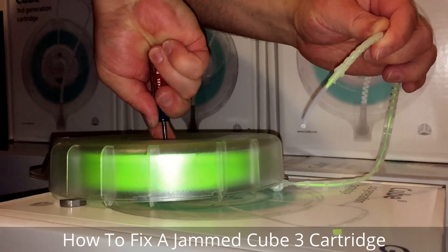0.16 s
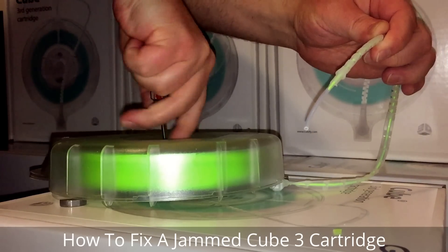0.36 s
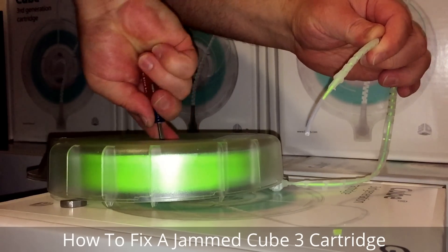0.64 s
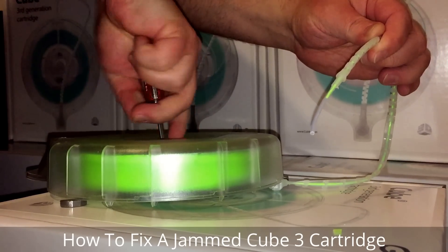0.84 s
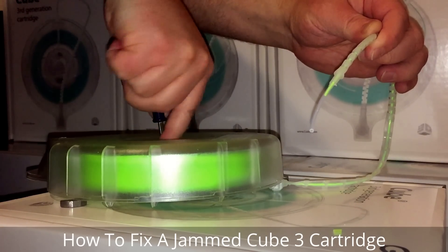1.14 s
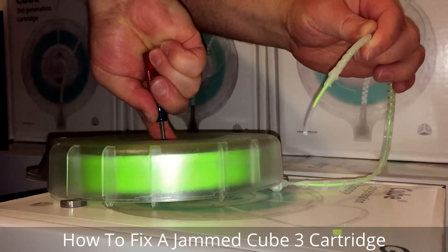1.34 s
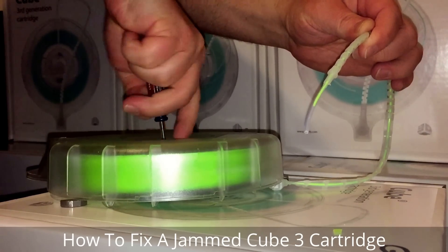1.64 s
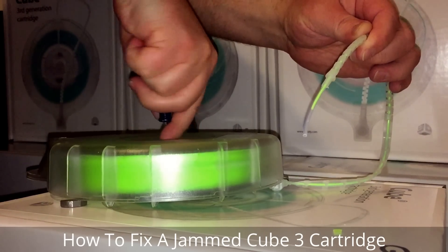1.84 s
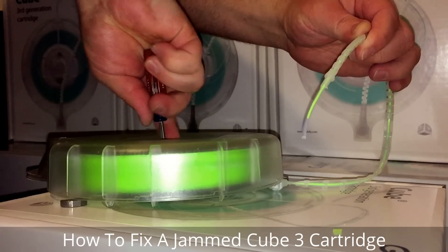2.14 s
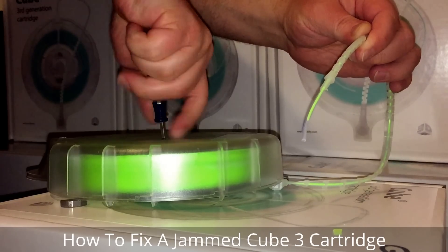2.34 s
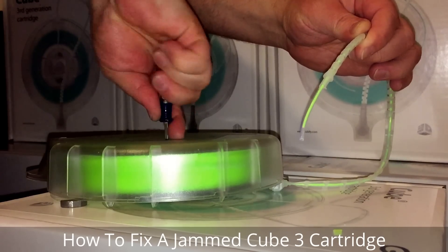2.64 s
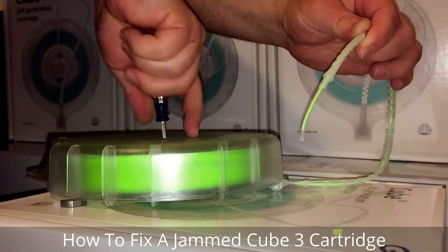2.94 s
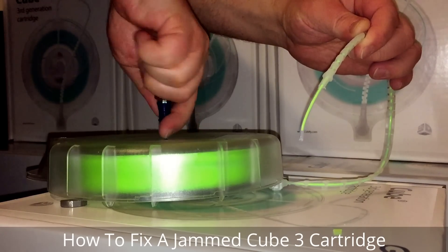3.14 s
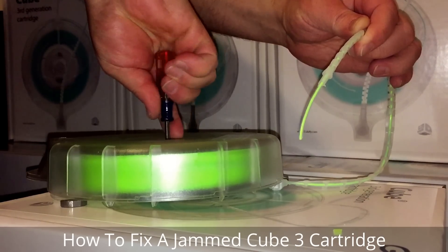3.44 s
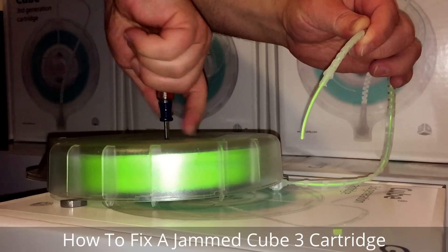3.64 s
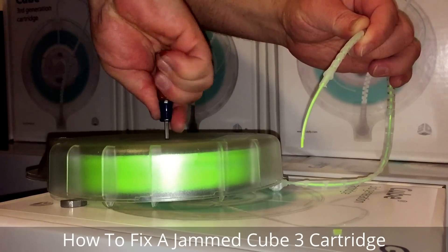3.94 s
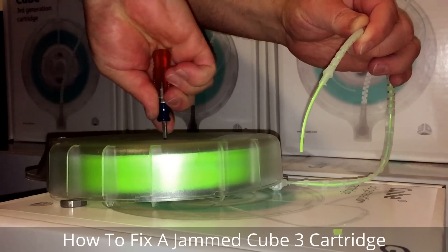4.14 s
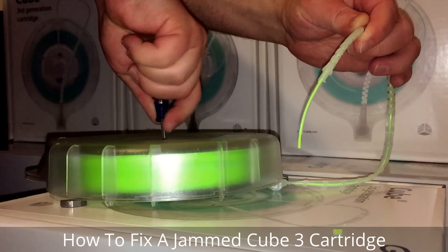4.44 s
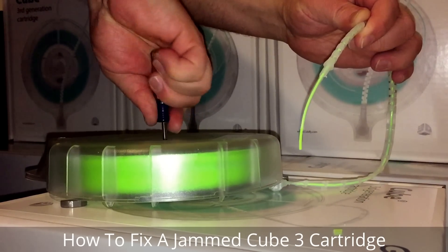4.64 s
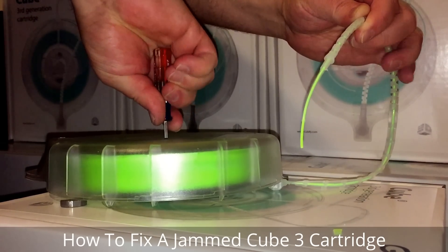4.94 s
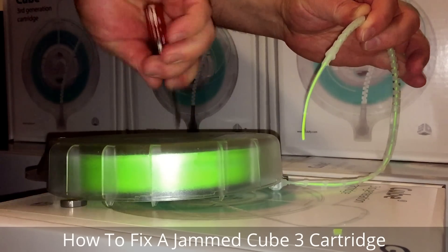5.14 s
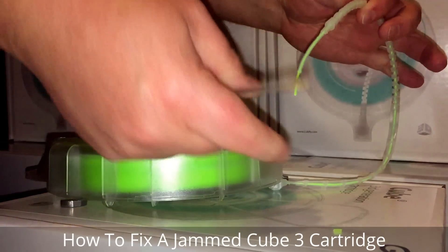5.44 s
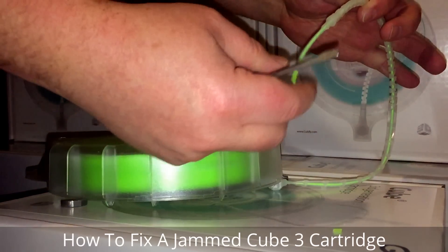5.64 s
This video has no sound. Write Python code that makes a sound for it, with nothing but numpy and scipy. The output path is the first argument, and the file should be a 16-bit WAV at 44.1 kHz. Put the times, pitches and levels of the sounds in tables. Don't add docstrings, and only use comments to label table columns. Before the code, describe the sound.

Close to a phone microphone in a small quiet room, a screwdriver turns a plastic gear inside a hollow cartridge. Uneven dry ticks and short grinding scrapes come in bursts. Early on, one jammed slip cracks very loudly and booms the table. Clicks continue, clustering densely later, until the steel blade rattles out of its slot, leaving faint hum and hiss.

```python
import sys
import numpy as np
from scipy import signal
from scipy.fft import rfft, irfft, next_fast_len
from scipy.io import wavfile

SR = 44100
rng = np.random.default_rng(int(sys.argv[2]) if len(sys.argv) > 2 else 0)


def waveform_to_disk(signal):
    frames = np.transpose(np.atleast_2d(signal))
    scaled = np.clip(frames, -1, 1) * 32767
    samples = np.round(scaled).astype(np.int16)
    wavfile.write(sys.argv[1], SR, samples)


def ratio(d):
    e = np.asarray(d, float) / 20
    return 10 ** e


N = 255382
T = np.arange(N) / SR


def shade(x, points):
    size = next_fast_len(len(x))
    hz, db = np.transpose(points)
    f = np.maximum(np.arange(size // 2 + 1) * SR / size, 1)
    gain = ratio(np.interp(np.log(f), np.log(hz), db))
    return irfft(rfft(x, size) * gain, size)[:len(x)]


def band(x, lo_hz, hi_hz):
    return signal.sosfilt(signal.butter(2, [lo_hz, min(hi_hz, 20000)], "band", fs=SR, output="sos"), x)


def unit(x):
    return x / np.sqrt(np.mean(x ** 2))


def ring(x, hz, t60):
    r = np.exp(-np.log(1000) / (max(t60, .002) * SR))
    w = 2 * np.pi * hz / SR
    return signal.lfilter([0, r * np.sin(w)], [1, -2 * r * np.cos(w), r * r], x)


def contacts(times, dbs, contact_s, hz=0):
    out, t = np.zeros(N + 800), np.arange(800) / SR
    swell = (1 - np.exp(-t / 0.00082)) * np.exp(-t / contact_s)
    pushes = rng.standard_normal((len(times), 800)) * swell
    felt = overall = np.sqrt(np.sum(pushes ** 2, axis=1))
    if hz:
        at_mode = np.abs(pushes @ np.exp(2j * np.pi * hz * t))
        felt = np.maximum(at_mode, overall / 2)
    for s, gain, push in zip(times, ratio(dbs) / felt, pushes):
        out[int(s * SR):][:800] += gain * push
    return out[:N]


def strike(modes, times, dbs, contact_s, scatter_db, rub=0, centre_hz=None, focus_db=0):
    hz = np.array(modes)[:, 0]
    share = scatter_db * rng.standard_normal((len(times), len(modes)))
    if centre_hz is not None:
        share = share - focus_db * np.log2(hz / centre_hz[:, None]) ** 2
    norm = np.sqrt(sum(ratio(db) ** 2 for _, db, _ in modes))
    out = np.zeros(N)
    for k, (f, db, t60) in enumerate(modes):
        push = contacts(times, dbs + share[:, k], contact_s, f) + rub
        out += ratio(db) / norm * ring(push, f, t60)
    return out


def grains(per_s, spread_db, grain_s):
    size_db = spread_db * np.minimum(rng.exponential(size=N), 3)
    hit = (rng.random(N) < per_s / SR) * ratio(size_db)
    envelope = signal.lfilter([1], [1, -np.exp(-1 / (grain_s * SR))], hit)
    return unit(envelope * rng.standard_normal(N))


def swells(table):
    gain = np.zeros(N)
    for s, db, rise_s, fall_s in table:
        away = np.maximum((s - T) / max(rise_s, .001), (T - s) / max(fall_s, .001))
        gain += ratio(db - 20 * away)
    return gain


# [f/Hz, rms level/dB]
HUM_TONES = [(59.2, -57), (193.8, -72)]
# [f/Hz, level/dB per Hz]
HISS_COLOUR = [(15, -48.5), (25, -22.5), (41, 2), (64, -4.5), (119, -31), (410, -35), (741, -38.5),
               (871, -36.5), (997, -38.5), (1170, -41), (1620, -42.5), (4260, -49), (15500, -55.5)]


def background():
    (mains_hz, mains_db), (motor_hz, motor_db) = HUM_TONES
    mains = np.sin(2 * np.pi * mains_hz * T)
    mains = mains * (1 + 0.22 * unit(band(rng.standard_normal(N), 0.23, 4)))
    motor = unit(ring(rng.standard_normal(N), motor_hz, 0.79))
    colour = [(f, db - 14 * (f < 90)) for f, db in HISS_COLOUR]
    hiss = shade(rng.standard_normal(N), colour)
    hiss = hiss / np.std(band(hiss, 260, 15500))
    return ratio(mains_db + 4.0) * mains + ratio(motor_db) * motor + ratio(-71) * hiss


# [f/Hz, t60/s]
ROOM_DECAY = [(125, 0.17), (500, 0.24), (2000, 0.2), (6000, .22), (14000, 0.067)]


def room(x, gap_s):
    t = T[:SR // 2]
    hz, t60 = np.transpose(ROOM_DECAY)
    tail = np.zeros(len(t))
    for f in 125 * 2. ** np.arange(8):
        octave = band(rng.standard_normal(len(t)), f / 2 ** .5, f * 2 ** .5)
        tail += octave * np.exp(-np.log(1000) * t / np.interp(np.log(f), np.log(hz), t60))
    tail = tail * (1 - np.exp(-t / gap_s))
    return signal.fftconvolve(x, tail / np.sqrt(np.sum(tail ** 2)))[:N]


# [f/Hz, level/dB, t60/s]
BLADE_MODES = [(588, -10, 0.051), (736, -6, 0.052), (1785, -1, 0.011), (1950, -12, .015),
               (2200, 4.5, 0.013), (2446, 0, 0.03), (2540, 3.5, 0.03), (2660, -6, 0.02), (2830, -20, .014),
               (3760, -17.5, 0.0076), (4830, -5, 0.012)]
# [f/Hz, level/dB, t60/s]
SHANK_MODES = [(3700, 2, 0.055), (4300, -6, .03), (4770, -3, .05), (5340, -5, .05), (5900, -9, .03),
               (7150, -16, .03)]
# [t/s, peak level/dB, tip ping level/dB against the peak]
BLADE_CONTACTS = [(2.2937, -38, -10), (2.3125, -49, -7.5), (2.3238, -53.5, 0.5), (5.0875, -32, 6.5),
                  (5.0935, -33.5, -5), (5.097, -27, -2), (5.1064, -30.5, -8), (5.1125, -27.5, 1.5),
                  (5.1184, -34.5, -12), (5.1245, -37, 6), (5.1345, -27, -7), (5.1484, -43, -8),
                  (5.1644, -62, 18)]


def blade():
    s, db, ping_db = np.transpose(BLADE_CONTACTS)
    slot = band(strike(BLADE_MODES, s, db - 0.5, 0.0014, 0.82), 340, 5700)
    rasp = band(contacts(s, db + 8.0, .003), 3800, 8800)
    ping = band(contacts(s, db + ping_db + 14, 0.00034), 9000, 10500)
    ping = band(ping, 6400, 19000)
    air = band(contacts(s, db - 2, .004), 10000, 15000)
    fade_s = 0.073
    buzz = rng.standard_normal(N) * np.exp(-T / fade_s * 3)
    shank = sum(ratio(g_db) * ring(buzz, hz, t60 / 9) for hz, g_db, t60 in SHANK_MODES)
    shank = shank / np.std(shank[:SR // 50])
    return slot + rasp + ping + air + ratio(-56) * shank


# [f/Hz, level/dB per Hz]
CRACK_TONE = [(150, -29.5), (250, -13), (544, -8), (681, -10), (837, -1), (1070, -7), (1730, -1),
              (3330, -8), (3960, -8), (4870, -11.5), (7250, -17.5), (10100, -22), (15500, -22)]
# [peak t/s, level/dB, rise/s, fall/s]; rise and fall span 20 dB
CRACK_JOLTS = [
    (1.404, -2, .003, 0.018),
    (1.414, -15.5, 0.0081, 0.039),
    (1.431, -14, 0.019, 0.0068),
    (1.44, -36, .01, 0.21),
]
# [t/s, level/dB]
TABLE_THUMPS = [
    (1.402, -33),
    (1.433, -19),
    (1.952, -51.5),
]
# [f/Hz, level/dB, t60/s]
TABLE_MODES = [(77, -12, .1), (103, -2, 0.06), (123.8, -3, .16), (146, -17, 1.5), (152, -17, .8),
               (198, -1, .11)]


def crack():
    chatter = shade(grains(1500, spread_db=-2.9, grain_s=0.0036), CRACK_TONE)
    shell = unit(sum(ratio(db) * ring(chatter, hz, t60) for hz, db, t60 in SHELL_MODES + LID_MODES))
    chatter = unit(chatter)
    first = swells(CRACK_JOLTS[:-1]) * (chatter + ratio(-12.5) * shell)
    duller = band(chatter, 100, 11000)
    after = swells(CRACK_JOLTS[-1:]) * (duller + ratio(-3.5) * shell)
    s, db = np.transpose(TABLE_THUMPS)
    return ratio(-7.5) * (first + after) + strike(TABLE_MODES, s, db, 0.006, 1.0)


# [t/s, ring peak level/dB, weight on lid and box/dB, edge snap/dB]; weight and snap are against the ring
SLIPS_AT_HUB = [(.0873, -51.5, -5, -27), (.142, -16, -10.5, -29), (.2259, -44, -7, -26),
                (0.2509, -45, 3, -23), (0.337, -54, -11, -28), (0.69, -42.5, -16, -33),
                (0.716, -27, -9.5, -35.5), (1.266, -49, -3, -36.5), (1.28, -39, -0.5, -35.5),
                (1.291, -35.5, -4, -48), (1.3277, -38.5, -4.5, -40), (1.384, -50, -2, -21.5),
                (1.9997, -52.5, -2, -27), (2.1794, -41.5, -6, -30), (2.2079, -42, -1.5, -23),
                (2.2414, -61, -8, -12.5), (2.598, -48, -3, -38.5), (2.7569, -42.5, -2.5, -31),
                (3.237, -38.5, -7.5, -41.5), (3.378, -36, -1.5, -20.5), (3.5907, -40, -13, -34),
                (4.0899, -40.5, -5, -34.5), (4.1157, -51, 2, -39.5), (4.1715, -41, -7, -31.5),
                (4.2989, -47, -6.5, -28), (4.693, -32, -8, -32), (4.7811, -57.5, 12, -8),
                (4.9277, -51, -7.5, -28), (4.9725, -41, -5.5, -28.5), (5.0194, -53, -16.5, -20)]
SLIPS_AT_WEB = [(.364, -67, -10, -17), (0.3524, -39, 0.5, -23), (0.8096, -57, -17, -29),
                (0.8623, -57, -6, -43), (1.153, -44, -7, -13.5), (1.2219, -46.5, 3, -32),
                (1.628, -44.5, 1.5, -37), (2.1044, -45.5, -1, -24), (2.3543, -28, -7, -28.5),
                (2.6657, -44.5, 2.5, -34), (2.819, -46.5, -3.5, -27), (3.0124, -54, -13, -18.5),
                (3.367, -35, -7.5, -30), (3.513, -51.5, -13.5, -24), (3.5379, -39.5, -16, -29.5),
                (3.6055, -36.5, -4, -42), (3.761, -32.5, -6, -30.5), (3.9657, -37.5, -4.5, -37.5),
                (3.9963, -39.5, 2, -27), (4.0119, -36.5, -5, -27), (4.0311, -40.5, -3, -18),
                (4.0473, -35, -6.5, -26), (4.0585, -40, -1, -17.5), (4.2046, -32, -17, -21.5),
                (4.3119, -37.5, -12.5, -23.5), (4.7108, -36, -16, -36), (4.728, -34.5, -6, -42),
                (4.7558, -37, -0.5, -22)]
SLIPS_AT_RIM = [(0.2381, -36, -30, -24), (0.5399, -44.5, -12, -22.5), (0.6246, -54.5, 3, -29),
                (0.6454, -52.5, -12, -40), (.7439, -39, -6.5, -29), (1.1888, -39.5, -23, -37),
                (1.6787, -64, 12, -24), (1.8896, -52, 4, -37), (1.958, -48.5, -5, -23),
                (2.1203, -45.5, 5, -20), (2.1443, -40, -2.5, -27), (2.621, -49, 6.5, -24),
                (2.651, -52, 2, -23.5), (2.6938, -52, -13, -26), (2.72, -50, 2, -29), (2.7415, -45, 3, -25),
                (2.7875, -37.5, -3, -19.5), (2.8542, -40, -1.5, -21.5), (2.9846, -61, -6.5, -21),
                (3.102, -46.5, -16.5, -22), (3.3023, -54, -16, -12), (3.3118, -37.5, -0.5, -30.5),
                (3.3576, -34.5, -3, -30), (3.4236, -49.5, -5, -25), (3.8845, -58.5, -12.5, -26),
                (3.9562, -36.5, -6.5, -26), (3.9832, -39.5, -1, -31), (4.8267, -55, 3, -21),
                (4.862, -48, -14, -29), (4.9149, -52, -2, -21)]


def tooth_slips():
    tables = [SLIPS_AT_HUB, SLIPS_AT_WEB, SLIPS_AT_RIM]
    s, ring_db, weight_db, snap_db = np.transpose(sum(tables, []))
    part = np.repeat([0, 1, 2], [len(table) for table in tables])
    creep_db = np.minimum(ring_db - 20, -46)
    s = np.r_[s, s - .0045]
    ring_db = np.r_[ring_db, creep_db]
    return s, ring_db, np.tile(weight_db, 2), np.tile(snap_db, 2), np.tile(part, 2)


# [f/Hz, level/dB, t60/s]
BOX_MODES = [(137, -4, 0.067), (147, -12, .12), (204.5, 6.5, .13), (248, -1.5, 0.071), (334.4, -6, 0.0067),
             (385.2, 1.5, 0.049)]
LID_MODES = [(497.4, 0.5, 0.079), (611.8, 4.5, 0.071), (705.4, 7.5, 0.024), (763, -6, 0.032),
             (843, -3, 0.09), (939.5, 1.5, 0.026), (1024, -5.5, 0.028)]
SHELL_MODES = [(1287, -5.5, 0.039), (1353, 1, 0.023), (1690, -0.5, 0.0111), (1795, 3, 0.011),
               (2006, 1.5, 0.018), (1990, 2, 0.0033), (2380, -11.5, 0.0056), (2543, 6.5, 0.016),
               (2620, -5.5, 0.015), (3016, -7.5, 0.026), (3400, -13.5, 0.0075), (4388, -11, 0.024)]
# [f/Hz, level/dB, t60/s]
TEETH_MODES = [(1290, -4, .035), (2006, -4, 0.015), (2640, -4, 0.013), (3500, -12.5, 0.02)]
LID_SHARE = (0.16, 1.5, -0.35)


def plastic_body(slips, low, high, scrape):
    s, ring_db, weight_db, _, part = slips
    ring_hz = np.array([1310, 1880, 2600])[part]
    lid_db = ring_db + weight_db + np.array(LID_SHARE)[part]
    rub = low * grains(260, spread_db=2.0, grain_s=0.0014)
    box = strike(BOX_MODES, s, ring_db + weight_db + 0.5, 0.0023, 0.89, ratio(-23.5) * rub)
    lid = strike(LID_MODES, s, lid_db, 0.010553, 3.1, ratio(-30.5) * rub)
    shell = strike(SHELL_MODES, s, ring_db + 6.0, 0.00173, 1.3, ratio(-21.0) * high * scrape,
                   ring_hz, focus_db=23.5)
    teeth = sum(ratio(db - 28.5) * ring(high * scrape, hz, t60) for hz, db, t60 in TEETH_MODES)
    return band(box + lid + shell + teeth, 100, 5200)


SNAP_AIR = (-3.5, -6.5, 1.5)


def edge_snap(slips):
    s, ring_db, weight_db, snap_db, part = slips
    snap_s = .0013
    edge_db = ring_db + snap_db
    air_db = np.array(SNAP_AIR)[part] + 3 * rng.standard_normal(len(s))
    click = band(contacts(s, edge_db + 28.0, snap_s), 2600, 6800)
    air = band(contacts(s, edge_db + air_db + 25, snap_s), 6400, 14000)
    shiver = band(contacts(s, edge_db + 18, 0.0065), 2400, 12000)
    scuff = band(contacts(s, ring_db - 3 - 0.53 * weight_db, .0055), 1200, 4900)
    return click + air + shiver + scuff


# [t/s of most effort, effort level/dB, build/s, ease/s]; build and ease span 20 dB
HAND_TWISTS = [(.003, -44.5, 0.018, 0.046), (.165, -42.5, 0.056, 0.19), (.71, -42.5, .13, 0.078),
               (.9, -56.5, 0.24, 0.1), (1.22, -52.5, 0.21, 1), (1.5, -42, 0.045, 0.12),
               (1.92, -61.5, 0.036, 0.29), (2.14, -55.5, .2, 0.38), (2.38, -58.5, 0.029, 0.12),
               (2.77, -47, 0.12, 0.062), (3.29, -62.5, 0.12, 0.43), (3.41, -40.5, 0.17, 0.026),
               (3.58, -70.5, 0.14, .15), (4.02, -50.5, 0.17, 0.15), (4.13, -49, 0.15, 0.3),
               (4.64, -62, .15, .2), (4.765, -43, 0.11, .12), (4.9, -55.5, 0.18, 0.23),
               (5.03, -63.5, 0.27, 0.13)]


def gear():
    low = swells(HAND_TWISTS)
    full_effort_db, shell_slope = -45, 1.25
    high = ratio(-55.5) * (low / ratio(full_effort_db)) ** shell_slope
    scrape = grains(700, spread_db=2.5, grain_s=0.002)
    slips = tooth_slips()
    body = plastic_body(slips, low, high, scrape)
    return body + edge_snap(slips) + ratio(-12.5) * high * band(scrape, 3700, 4900)


def scene():
    near = gear() + crack() + blade()
    wall = ratio(-14.0) * np.roll(band(near, 490, 5000), int(.009 * SR))
    tail = ratio(-10.5) * room(near, gap_s=0.0019)
    return (near + wall + tail + background())[None]


def low_pass(x):
    return signal.sosfilt(signal.butter(12, 15810, fs=SR, output="sos"), x)


def record(dry):
    dry = signal.sosfilt(signal.butter(4, 48, "high", fs=SR, output="sos"), dry)
    notched = signal.lfilter(*signal.iirnotch(10500, 14, fs=SR), dry)
    dry = notched * 0.55 + 0.42 * dry
    top = signal.ellip(8, .2, 70, 15450, fs=SR, output="sos")
    mix = signal.sosfilt(top, .7 * np.tanh(dry / .7))
    return low_pass(mix)


dry = scene()
out = record(dry)
waveform_to_disk(out)
```